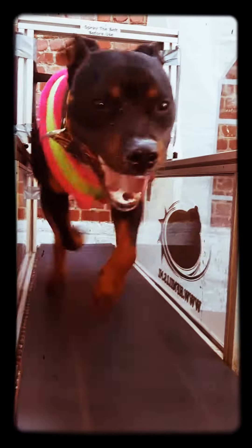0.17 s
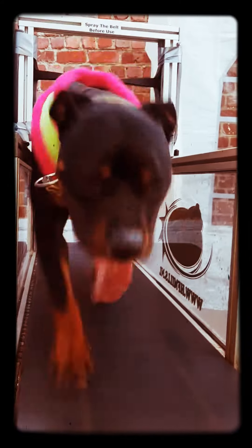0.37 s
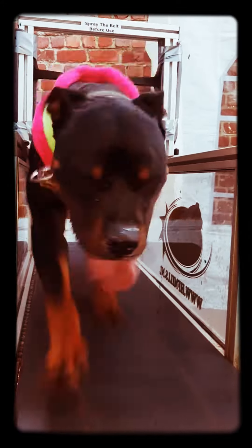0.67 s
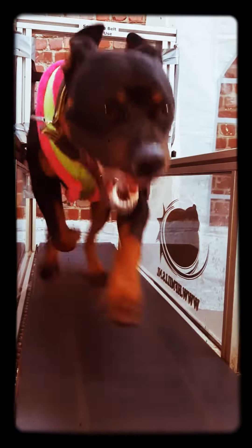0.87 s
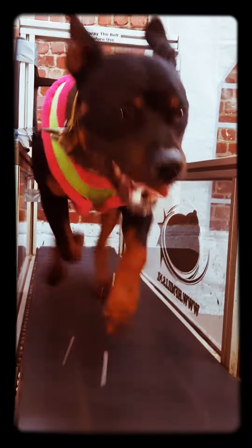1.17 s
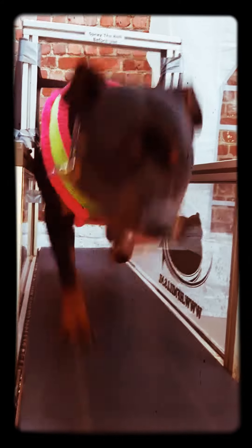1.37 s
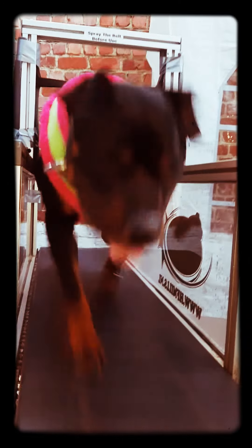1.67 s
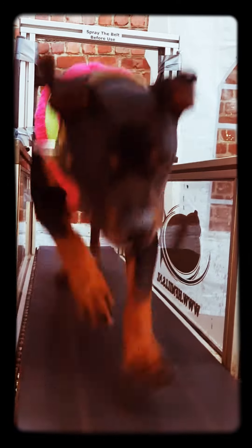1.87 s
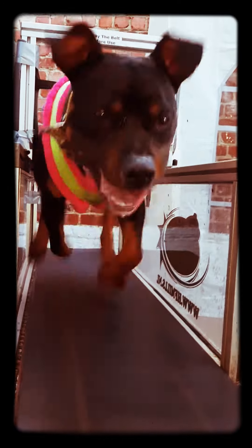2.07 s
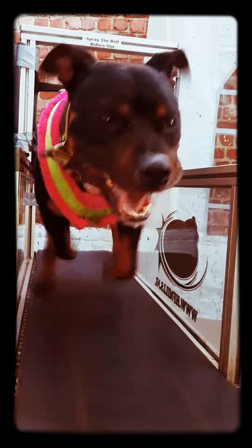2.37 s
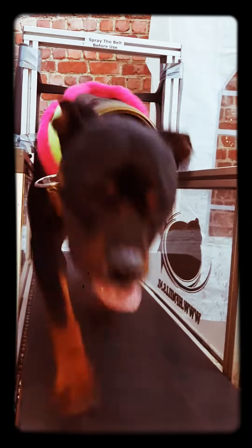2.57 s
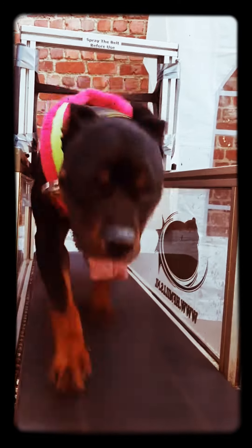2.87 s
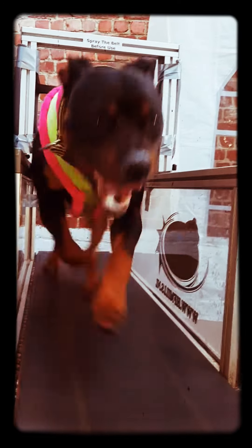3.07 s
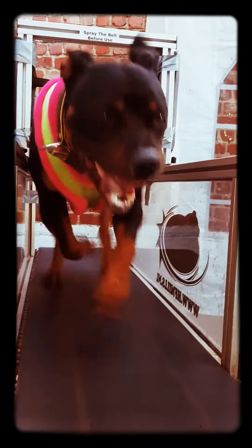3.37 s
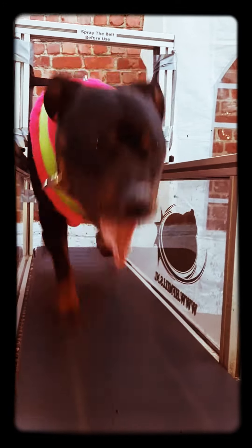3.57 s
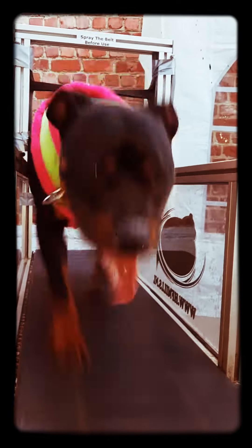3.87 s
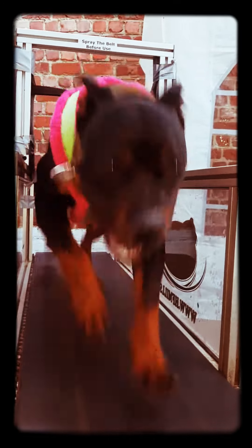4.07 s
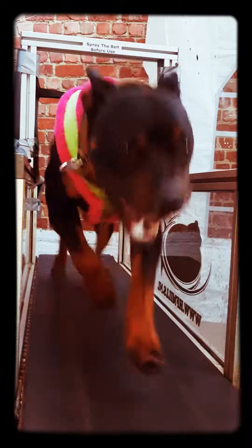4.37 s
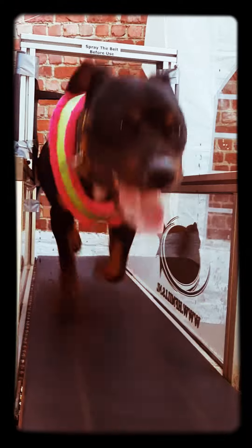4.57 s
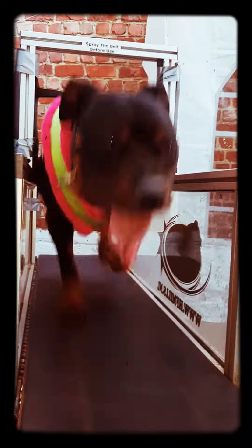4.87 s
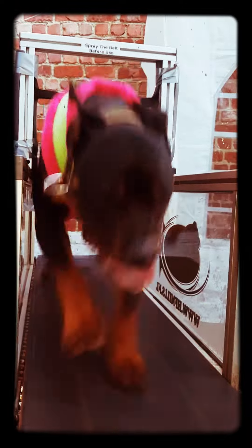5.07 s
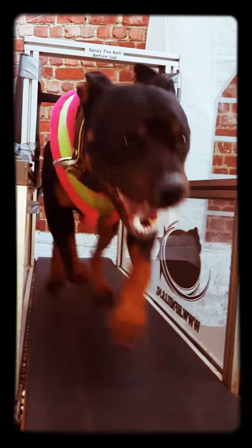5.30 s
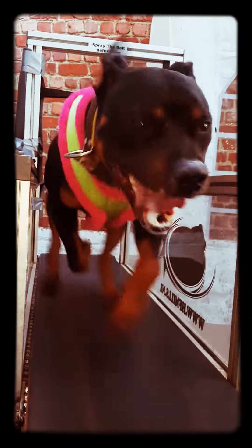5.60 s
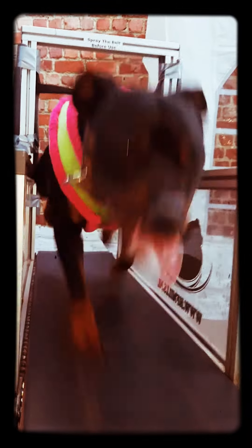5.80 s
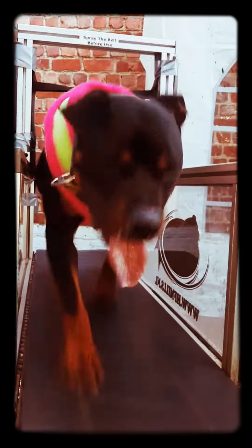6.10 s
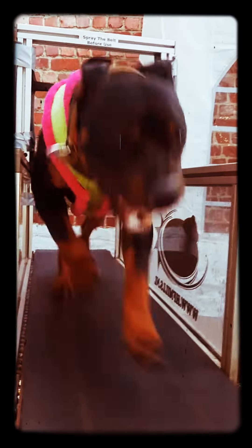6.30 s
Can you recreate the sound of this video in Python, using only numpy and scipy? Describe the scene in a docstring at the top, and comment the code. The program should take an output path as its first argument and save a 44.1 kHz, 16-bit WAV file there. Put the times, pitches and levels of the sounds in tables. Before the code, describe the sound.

Close stereo sound of a heavy dog galloping on an unpowered slat treadmill in a brick room. About three times a second a soft hind thud leads into two louder forepaw thuds with hard, bright claw and slat clacks. Under them the belt rumbles, clatters and hisses without pause, swelling with each stride, while slats tick rapidly and bearings whine faintly. Short echo.

```python
"""A brick room, two close microphones facing a dog that gallops on an unpowered slat treadmill.
At about three strides a second, padded thuds ring the deck; claws and slats clack in short bright clicks.
Streams of tiny knocks make the rollers' rumble, clatter and hiss, which swell under each stride; the bearings
whine in two narrow bands. Between the clacks the slats tick over the end wheel. The walls add a short echo."""
import sys
import numpy as np
from scipy import signal
from scipy.fft import rfft, irfft
from scipy.io import wavfile
from scipy.ndimage import uniform_filter1d

SR = 44100
rng = np.random.default_rng(int(sys.argv[2]) if len(sys.argv) > 2 else 0)


def log_audio(samples):
    """Write samples as a 16-bit WAV file to the path given in sys.argv[1]."""
    # one column per channel
    frames = np.atleast_2d(samples).T
    # limit to full scale, then quantise
    limited = np.clip(frames, -1, 1)
    pcm = np.round(limited * 32767).astype(np.int16)
    wavfile.write(sys.argv[1], SR, pcm)


N = 284004
TIME = np.arange(N) / SR

# one gallop stride a row: (hind paws land [s], first forepaw [s], second forepaw [s],
# hind weight [dB], first forepaw weight [dB], second forepaw weight [dB])
STRIDES = [(-0.115, 0.014, 0.078, 4.5, 1, 0.5), (0.255, 0.33, 0.409, 1, 0, 0),
           (0.549, 0.657, 0.738, -1, 0.5, -1), (0.877, 0.996, 1.063, -0.5, 0.5, -2),
           (1.2, 1.296, 1.37, 0, -0.5, 2), (1.494, 1.619, 1.688, 0, -0.5, 2.5),
           (1.818, 1.924, 1.99, 0, 2.5, 0), (2.137, 2.256, 2.309, 2, 1, 1.5),
           (2.43, 2.531, 2.61, -1, 2.5, 3.5), (2.73, 2.857, 2.922, 1.5, 1, 1.5),
           (3.058, 3.192, 3.256, 2.5, -2, -1), (3.382, 3.5, 3.57, -0.5, -0.5, -1),
           (3.684, 3.814, 3.882, -5.5, 1.5, -1.5), (4.028, 4.119, 4.2, 0, 0.5, -3),
           (4.34, 4.445, 4.524, -1.5, -4.5, -2), (4.675, 4.781, 4.846, -2.5, -2.5, -4),
           (5.01, 5.099, 5.17, -2, -6, -3.5), (5.305, 5.417, 5.48, -2, -1.5, -1),
           (5.615, 5.73, 5.8, 0.5, -2.5, -0.5), (5.934, 6.071, 6.131, 1, -0.5, 0.5),
           (6.258, 6.38, 6.451, 0.5, -1, -15)]
# claws and slats striking hard: (time [s], relative level [dB], brightness tilt [dB])
HARD_STRIKES = [(0.0096, 4.5, -2.5), (0.0212, 0.5, -1.0), (0.068, 3, 6), (0.0764, 1, 0), (0.0875, 1, 3),
                (0.0991, -3, 0.0), (0.1638, -4.5, -2), (0.255, -2, -8), (0.2672, -1.5, -12.0),
                (0.3245, -6, 0), (0.3336, 7, -3.5), (0.3444, -4, -8), (0.4015, -0.5, 1), (0.4096, -3, -7.0),
                (0.4642, -9, -9), (0.4767, -5.5, -6), (0.656, -7, -12), (0.6621, 7.0, -0.5),
                (0.674, 0, -4.0), (0.7277, -1, 1), (0.7524, -2, 2), (0.8065, -1, -1.0), (1.0032, -3, -12),
                (1.0583, 0.5, -9), (1.07, -3.3, -7.0), (1.0831, -9, -3.0), (1.1363, -9.5, -1),
                (1.1614, -6, 8), (1.1741, -8, 0), (1.293, -6, -6.0), (1.3042, 1, 4), (1.3161, -9, -8),
                (1.366, 4, -6), (1.3798, -8, -7.0), (1.3918, 1.5, 3), (1.4687, -2.0, 5), (1.61, -3, 8),
                (1.6194, 4.5, -6), (1.645, -6, -9), (1.6841, 7.5, -1.5), (1.6953, 2, 3), (1.708, -7, -4),
                (1.7191, -5.6, 3.0), (1.757, -6.9, 4), (1.7936, -5, -5), (1.8822, -6, -5), (1.9144, -2, 10),
                (1.9208, 0, -4.0), (1.9312, 7, -5), (1.9415, 4, -9), (1.993, 6, -4), (2.1924, 3, -3.0),
                (2.2461, -6, -5), (2.2536, 7.5, -1), (2.2654, -3, -4.0), (2.3033, 4.0, -7), (2.3135, 6, 1),
                (2.3246, 6, 1.0), (2.3374, -9, -3.0), (2.3975, -7.5, 6), (2.4083, -6, 1), (2.503, 0, -7),
                (2.5153, -6, -4), (2.526, 8, -1), (2.537, 4, -6), (2.5608, -5, -8), (2.5724, -5, -6),
                (2.6125, 6.5, -5), (2.6198, 5, 3.0), (2.63, 0.5, -4.0), (2.737, 1, -11), (2.7839, -1, 10),
                (2.7948, -7, -1), (2.8187, 1.4, 0), (2.8304, -2, 1), (2.855, 4, -3), (2.8646, 6, 3),
                (2.8768, 3, 0.0), (2.9, -2, -7), (2.9092, -1, -6), (2.914, 2, -2.0), (2.9249, -1, -3.0),
                (2.9354, 2.5, -1), (2.9466, -0.3, -3.0), (3.0398, -4.5, -3.0), (3.0645, -3.5, -12),
                (3.075, 0.5, -4.0), (3.168, -5, 2.0), (3.1907, -1.9, -2), (3.2417, -2, 0.0),
                (3.2731, 3.5, -2), (3.3097, -4.5, -4.0), (3.3567, -9, -8.0), (3.3681, -5, -12),
                (3.4043, -5, 4), (3.4393, -3, -3.0), (3.4519, -12, -2), (3.4849, -6.5, 2.0),
                (3.499, -0.5, -12.0), (3.5105, -10, -10.0), (3.5628, 1, -13), (3.571, 1, 7),
                (3.5805, 1.5, -7), (3.6529, -6.7, -2), (3.6655, -8, 1), (3.6767, -5.5, 4),
                (3.8073, 7.5, -0.0), (3.8184, 1, -9.0), (3.8728, 1, -3), (3.88, 7.5, -2.0),
                (3.8928, -2, -7.0), (3.9037, 1.5, -3), (3.9154, -2, 0), (3.9522, -5, -1),
                (3.9649, -5.0, -1), (3.9882, -7, -6), (4.0738, -3.5, -7), (4.1131, -1, 1),
                (4.1227, 8.5, -6), (4.1325, 5.5, -8), (4.189, 0, -7.0), (4.1956, 9.0, -9), (4.2069, 4, 0),
                (4.3807, 0.3, -8.5), (4.438, -1, -8), (4.445, -2, -4), (4.4552, -2.5, -11),
                (4.5185, 1, -3.0), (4.5294, 4.5, -3), (4.7059, -6, 2.0), (4.7732, -5.0, -1.0),
                (4.7797, 7, 1), (4.8353, 2, -7.0), (4.8445, -2, 0), (4.8554, 1, -15), (4.9573, -7, -9),
                (5.0223, -5.0, -12), (5.0861, -7.2, 0.0), (5.1103, 0, -14), (5.158, -2.5, -7),
                (5.1646, 2, -5), (5.177, -0.5, 0), (5.1865, -2.5, -6), (5.4201, 3.5, 3), (5.609, -1.0, -14),
                (5.7214, 7, -0.0), (5.7348, 11, -6), (5.7471, -4, -3), (5.799, 0.5, 3.0), (5.8097, -3, -10),
                (5.8232, -3.9, -16), (5.873, -4.5, 6), (5.899, -6.5, -6), (6.0612, -4, -5), (6.1283, -3, 4),
                (6.137, -2, -2.0), (6.148, -2, -15), (6.2112, -6, -14), (6.2229, -2.7, 0), (6.3739, -9, 2),
                (6.3835, 4.1, 9), (6.395, 1.5, -14)]
# the coasting belt as the dog speeds up and eases off: (time [s], relative level [dB])
COAST = [(0.0, 4.5), (1.0, 0), (2.2, 5), (3.0, 4), (3.9, 3), (4.6, -1), (5.25, -0.5), (5.8, 2.5),
         (6.44, 3.5)]
# how the belt's hiss answers a footfall: (coasting [dB], first hind paw [dB], second hind paw [dB],
# forepaw [dB], rise [s], hold [s], fall [s], dip in flight [dB])
HISS_LOAD = (-38, -39.5, -35.5, -31, 0.0067, 0.0283, 0.0129, 2)

RING_HZ, RING_OCTAVES = 2940, 0.23  # usual note of a struck slat and its spread


def paws():
    """Padded blows set the deck ringing: the hind pair lands far back as one thud, the forepaws close by."""
    # push of a padded paw: (frequency [Hz], level [dB per Hz])
    thud_spectrum = [(25, -61), (70, -27), (150, -3), (260, -6), (450, 7.5), (900, -0.5), (2000, -23),
                     (5000, -43), (16000, -51)]
    fore_db, hind_db = -13.2, -21.5  # relative levels of a forepaw and the hind pair at usual weight
    apart = 0.39  # share of a thud that reaches each microphone by its own path
    out = np.zeros((2, N))
    push = np.pad(colour(thud_spectrum), (0, SR // 12))
    for hind, first, second, hind_weight, first_weight, second_weight in STRIDES:
        landings = [(hind, hind_db + hind_weight),
                    (first, fore_db + first_weight),
                    (second, fore_db + second_weight)]
        for s, db in landings:
            add(out, s, amp(db) * blow(push, t60=0.049, scatter_db=7.0))
    shared = out.sum(0) / np.sqrt(2)
    return deck(apart * out + (1 - apart) * shared, ring_db=-0.5)


def clacks():
    """Hard strikes: a compact click with a few cycles of the slat's ring, then a small bounce as it settles."""
    strike_db, chatter_db = 0.53, -6  # first contact and bounce, against the table's level
    chatter_s = 0.0018  # usual delay of the bounce, up to an octave shorter or longer
    out = np.zeros((2, N))
    chances = rng.uniform(-1, 1, (len(HARD_STRIKES), 2))
    for (s, db, bright_db), (late, note) in zip(HARD_STRIKES, chances):
        strike = slat(bright_db, RING_HZ * 2 ** (RING_OCTAVES * note))
        strike = np.pad(strike, (0, SR // 40))
        contact = blow(strike, t60=0.005, scatter_db=-0.5)
        add(out, s, amp(db + strike_db) * contact)
        bounce = blow(strike, t60=0.014, scatter_db=5)
        add(out, s + chatter_s * 2 ** late, amp(db + chatter_db) * bounce)
    return out


def claws():
    """On the hardest landings a claw tip snaps against the belt in a very short contact."""
    # spectrum of the snap: (frequency [Hz], level [dB per Hz])
    snap_spectrum = [(3000, -37), (7000, -9), (9300, 1.5), (12000, 7), (16000, -17)]
    # claw tips catching the belt: (time [s], relative level [dB])
    catches = [(1.6844, -11), (1.9311, -4), (1.9415, -4), (1.993, -7.7), (2.3246, -7), (2.526, -3),
               (2.8646, -9), (3.2731, -11), (3.8073, -12), (3.8801, -0.5), (4.1227, -2), (4.1955, -7.3),
               (4.7804, -12), (5.7216, -4.2), (5.7345, -1.5)]
    out = np.zeros((2, N))
    snap = np.pad(colour(snap_spectrum), (0, SR // 50))
    for s, db in catches:
        add(out, s, amp(db) * blow(snap, t60=0.006, scatter_db=2))
    return out


def slats():
    """Between the hard clacks every slat ticks in turn over the end wheel, some much harder than others."""
    slats_per_s = 82
    tick_db, per_load, spread_db = -19, 0.26, 4  # relative tick level, its gain under load, its unevenness
    marks = np.sort([0, *np.array(HARD_STRIKES)[:, 0], N / SR])
    times = []
    for start, end in zip(marks, marks[1:]):
        steps = round((end - start) * slats_per_s)
        times.append(np.linspace(start, end, steps + 1)[1:-1])  # the clacks take the end points
    times = np.concatenate(times)

    force, bright, wobble, note = rng.standard_normal((len(times), 4)).T
    load_db = np.interp(times, TIME, loaded(*HISS_LOAD)) - HISS_LOAD[0]
    level_db = tick_db + per_load * load_db + spread_db * np.minimum(force, 1.4)
    times = times + 0.00043 * wobble
    notes_hz = RING_HZ * 2 ** (RING_OCTAVES * note)
    out = np.zeros((2, N))
    for s, db, tilt_db, hz in zip(times, level_db, 9.5 * bright, notes_hz):
        add(out, s, amp(db) * blow(slat(tilt_db, hz), t60=0.01, scatter_db=-3))
    return out


def knocks():
    """Heavy landings make one part of the frame ring: single short modes, the higher ones dying sooner."""
    # the ringing landings: (time [s], relative level [dB], pitch [Hz])
    landings = [(0.393, -21, 920), (1.311, -32, 378), (1.63, -27, 380), (1.921, -24, 394),
                (1.935, -26, 506), (2.535, -22.5, 917), (2.808, -31, 385), (3.568, -27, 917),
                (4.143, -27, 500)]
    t = np.arange(SR // 6) / SR
    out = np.zeros((2, N))
    for s, db, hz in landings:
        t60 = 0.11 * np.sqrt(400 / hz)  # 0.11 s at 400 Hz
        envelope = (1 - np.exp(-t / 0.0023)) * np.exp(-np.log(1000) * t / t60)
        knock = amp(db + 4.5) * envelope * np.sin(2 * np.pi * hz * t)
        add(out, s, np.tile(knock, (2, 1)))
    return out


def scuffs():
    """Paws scuff the slats as they push off: rough swishes of pads that grip and slip."""
    # the push-offs: (time [s], relative level [dB], pitch [Hz])
    push_offs = [(.1, -32, 2340), (.42, -36, 2500), (.745, -33.5, 2310), (1.03, -34, 2320),
                 (1.32, -36, 1901), (1.99, -32, 2326), (5.49, -38, 2340), (5.77, -31, 1390),
                 (6.138, -35.5, 2804)]
    grip = unit(amp(3.9 * drift(per_s=230)))
    swishes = sum(amp(db) * swell(s, length=0.042) * whistle(hz, width_hz=500) for s, db, hz in push_offs)
    return grip * swishes


def rollers():
    """Slats roll over the wheels in countless small knocks, louder under the dog's weight."""
    # spectra of the three layers: (frequency [Hz], level [dB per Hz])
    rumble_spectrum = [(25, -59), (60, -27), (110, -18.5), (190, -13), (225, -3), (380, -1), (560, -5.5),
                       (750, -7), (1400, -24.5), (4000, -85)]
    clatter_spectrum = [(300, -34), (560, -0.5), (720, -5), (950, 0), (1200, 0.6), (1600, 1), (2100, -5),
                        (3000, -3.5), (4500, -22), (7000, -23), (9000, -38), (16000, -43)]
    hiss_spectrum = [(800, -23.5), (2000, -6.5), (2600, -1.5), (3000, 2), (3900, 1), (5500, -3), (7000, -4),
                     (8000, -10.5), (9300, -13.5), (12000, -17.5), (16000, -27)]
    # answer to a footfall: (coasting [dB], first hind paw [dB], second hind paw [dB], forepaw [dB],
    # rise [s], hold [s], fall [s], dip in flight [dB])
    rumble_load = (-47.5, -38.5, -38, -35.5, 0.0471, 0.07, 0.0538, 4.5)
    clatter_load = (-40, -37.5, -35.5, -30, 0.0184, -0.0054, 0.048, 6)

    shake = drift(per_s=75)
    rumble = deck(convolve(impacts(per_s=800, range_db=2.0), colour(rumble_spectrum)), ring_db=-7.5)
    clatter = deck(convolve(impacts(per_s=2000, range_db=2.5), colour(clatter_spectrum)), ring_db=-6.0)
    hiss = convolve(impacts(per_s=7000, range_db=1.5), colour(hiss_spectrum))
    rumble = unit(rumble) * amp(loaded(*rumble_load) + 0.3 * shake)
    clatter = patchy(clatter, patchy_db=2.5) * amp(loaded(*clatter_load) + 0.97 * shake)
    hiss = patchy(hiss, patchy_db=2.5) * amp(loaded(*HISS_LOAD) + 0.3 * shake)
    return rumble + clatter + hiss


def fizz():
    """Fine sizzle of the spinning wheels: it follows the belt's speed more than the load."""
    # spectrum of the sizzle: (frequency [Hz], level [dB per Hz])
    fizz_spectrum = [(2500, -18), (6500, 1), (8200, -3), (9300, -4.5), (11000, 3), (13000, 3.5),
                     (16000, -5.5)]
    sizzle = convolve(impacts(per_s=12000, range_db=3.5), colour(fizz_spectrum))
    load_db = 0.25 * loaded(*HISS_LOAD)
    speed_db = 0.47 * curve(COAST, axis=1)
    level_db = -32.0 + load_db + speed_db + 0.74 * drift(per_s=38)
    return patchy(sizzle, patchy_db=3.0) * amp(level_db)


def bearings():
    """A thin, fuzzy whine on two close notes follows the load on the wheels and flares into short squeals."""
    # the two notes: (frequency [Hz], relative level [dB])
    whine_notes = [(10425, 0), (10590, -2.5)]
    # squeals as the wheels take load: (time [s], level [dB], length [s])
    squeals = [(.11, -45, 0.048), (0.316, -35, 0.04), (0.668, -46, .06), (0.957, -45, .07),
               (1.08, -47, 0.063), (1.27, -44, .06), (1.89, -40, .07), (2.227, -36, 0.026),
               (2.535, -38, 0.031), (3.138, -43, 0.046), (3.47, -44, .045), (3.634, -54, .05),
               (3.771, -43, .06), (4.09, -47, .06), (5.1, -54, .046), (5.397, -44, 0.088), (6.09, -53, .12)]
    whine_db, follows = -57, 0.45  # whine at the coasting reference, and its gain under load
    notes = unit(sum(amp(db) * whistle(hz, width_hz=52) for hz, db in whine_notes))
    level = amp(whine_db + follows * (loaded(*HISS_LOAD) - HISS_LOAD[0]))
    flares = sum(amp(db) * swell(s, length) for s, db, length in squeals)
    return notes * (level + flares)


def room(x):
    """Diffuse reflections from the walls: decaying noise, each band with its own decay time."""
    # the room's decay: (frequency [Hz], t60 [s])
    decay = [(200, 0.1), (1000, 0.36), (4000, 0.097), (14000, 0.05)]
    noise = rng.standard_normal((2, SR // 2))
    hz, t, z = signal.stft(noise, SR, nperseg=256)
    fade = np.exp(-np.log(1000) * t / read(decay, hz)[:, None])
    tail = signal.istft(z * fade, SR, nperseg=256)[1]
    tail *= np.clip(np.arange(tail.shape[1]) / SR / 0.0042, 0, 1)  # builds up over 4.2 ms
    return convolve(x, tail / np.linalg.norm(tail[0]))


def loaded(coast_db, hind_db, other_hind_db, fore_db, rise_s, hold_s, fall_s, flight_db):
    """Level in dB of a belt layer: it swells under each of the four paws and dips while the dog is in the air."""
    hind_gap_s = 0.044  # from one hind paw to the other
    flight_lead_s, flight_s = 0.044, 0.11  # all paws are off the belt just before the hind pair lands
    t = TIME[::64]
    power = amp(coast_db + curve(COAST, axis=1)[::64]) ** 2
    airborne = 0
    for hind, first, second, hind_weight, first_weight, second_weight in STRIDES:
        airborne = airborne + np.exp(-((t - hind + flight_lead_s) / (flight_s / 2)) ** 2)
        landings = [(hind, hind_db + hind_weight),
                    (hind + hind_gap_s, other_hind_db + hind_weight),
                    (first, fore_db + first_weight),
                    (second, fore_db + second_weight)]
        for s, db in landings:
            before, after = (s - t) / rise_s, (t - s - hold_s) / fall_s
            away = np.maximum(np.maximum(before, after), 0)
            power = power + (amp(db) * np.exp(-away)) ** 2
    return np.interp(TIME, t, 10 * np.log10(power) - flight_db * airborne)


def deck(x, ring_db):
    """A force heard directly and through the decaying modes of the deck and frame."""
    # what they ring with: (frequency [Hz], relative level [dB], t60 [s])
    modes = [(259, -6.5, 0.12), (311, 10, 0.095), (379, 11, 0.12), (434.6, 4, 0.066), (497.6, 10.5, 0.087),
             (583, 4, 0.19), (714, 8, 0.059), (805, 5, 0.021), (906, 8.5, 0.091), (1100, 1, 0.11)]
    t = np.arange(SR // 5) / SR
    ring = sum(amp(db - 60 * t / t60) * np.cos(2 * np.pi * hz * t) / t60 for hz, db, t60 in modes)
    return x + amp(ring_db) * convolve(x, ring * 2 * np.log(1000) / SR)


def slat(bright_db, hz):
    """One struck slat: a click and a note that dies within a few milliseconds."""
    # spectrum of the click: (frequency [Hz], level [dB per Hz])
    click_spectrum = [(100, -59), (400, -16.5), (1000, -10.5), (2200, -15), (2800, -2), (3600, 4.5),
                      (5000, 0.8), (7100, 1.5), (7900, -11), (9500, -14.5), (12000, -15.5), (16000, -28)]
    ring_db, ring_t60_s = -8.5, 0.006  # the slat's own note, against its click
    click = colour(click_spectrum, bright_db)
    t = np.arange(len(click)) / SR
    envelope = np.exp(-np.log(1000) * t / ring_t60_s) * (1 - np.exp(-t * hz))
    ring = np.cos(2 * np.pi * hz * t) * envelope
    both = click + amp(ring_db) * ring / np.linalg.norm(ring)
    return both / np.linalg.norm(both)


def blow(x, t60, scatter_db):
    """A sharp contact, then a short scatter through the slats that differs at each microphone."""
    t = np.arange(SR // 12) / SR
    response = rng.standard_normal((2, len(t))) * np.exp(-np.log(1000) * t / t60)
    response *= amp(scatter_db) / np.linalg.norm(response[0])
    response[:, 0] += 1  # the contact itself
    return convolve(x, response / np.linalg.norm(response[0]))


def impacts(per_s, range_db):
    """A stereo stream of tiny random knocks of uneven size."""
    shape = (3, N)
    size = amp(range_db * np.minimum(rng.exponential(1, shape), 4))
    sign = rng.choice([-1, 1], shape)
    strikes = rng.random(shape) < per_s / SR
    return unit(spread(size * sign * strikes))


def spread(three):
    """One shared and two separate signals become a pair partly alike at the two microphones."""
    # likeness of the belt's sound at the microphones: (frequency [Hz], likeness [0-1])
    likeness = [(40, 0), (130, 1), (300, 0.94), (650, 0.92), (1400, 0.5), (2300, 0), (3000, 0.47),
                (4500, 0.01), (7000, 0.1), (14000, 0)]
    z = rfft(three)
    same = np.clip(read(likeness, np.fft.rfftfreq(N, 1 / SR)), 0, 1)
    return irfft(np.sqrt(same) * z[0] + np.sqrt(1 - same) * z[1:], N)


def patchy(x, patchy_db):
    """Random, smoothed level changes over time and frequency make the noise's colour uneven."""
    z = signal.stft(x, SR, nperseg=512)[2]
    field = rng.standard_normal(z.shape[1:])
    field = uniform_filter1d(field, size=4, axis=0)  # smooth over frequency
    field = uniform_filter1d(field, size=5, axis=1)  # smooth over time
    return unit(signal.istft(z * amp(patchy_db * unit(field)), SR, nperseg=512)[1][:, :N])


def whistle(centre_hz, width_hz):
    """Stereo noise in one resonance, down to half amplitude width_hz either side."""
    band = 1 / (1 + ((np.fft.rfftfreq(N, 1 / SR) - centre_hz) / width_hz) ** 4)
    return unit(irfft(rfft(rng.standard_normal((2, N))) * band, N))


def swell(s, length):
    """A bell in time, with the given length at half power."""
    return np.exp(-2 * np.log(2) * ((TIME - s) / length) ** 2)


def drift(per_s):
    """Smooth random wander of rms 1, slower than per_s cycles a second."""
    slow = np.fft.rfftfreq(N, 1 / SR) < per_s
    return unit(irfft(rfft(rng.standard_normal(N)) * slow, N))


def colour(points, tilt_db=0):
    """Causal (minimum-phase) response of unit energy with the given spectrum, tilted around 4.5 kHz."""
    hz = abs(np.fft.fftfreq(2048, 1 / SR))
    tilt = tilt_db * np.tanh((hz - 4500) / 1200) / 2
    log_gain = np.log(amp(read(points, hz) + tilt))
    response = np.fft.ifft(np.exp(signal.hilbert(log_gain).conj())).real[:len(hz) // 2]
    return response / np.linalg.norm(response)


def convolve(x, response):
    """Convolution along time, cut to the input's length."""
    return signal.fftconvolve(np.atleast_2d(x), np.atleast_2d(response), axes=1)[:, :x.shape[-1]]


def add(mix, s, sound):
    """Mixes a stereo sound in at s seconds."""
    part = mix[:, max(round(s * SR), 0):][:, :sound.shape[1]]
    part += sound[:, :part.shape[1]]


def read(points, hz):
    """Reads a frequency table on a log-frequency axis."""
    f, value = np.transpose(points)
    return np.interp(np.log(hz + 1), np.log(f + 1), value)


def curve(rows, axis):
    """One column of a control table at every sample."""
    rows = np.asarray(rows)
    return np.interp(TIME, rows[:, 0], rows[:, axis])


def amp(db):
    """Decibels to gain."""
    return 10 ** (np.asarray(db) / 20)


def unit(x):
    """Scales to rms 1."""
    return x / np.sqrt(np.mean(x ** 2) + 1e-20)


def lag_left(pair):
    """Sound reaches the right microphone first, the left one 7.5 samples later."""
    left_lag_s = 7.5 / SR
    late = np.exp(-2j * np.pi * np.fft.rfftfreq(N, 1 / SR) * left_lag_s)
    return np.array([irfft(rfft(pair[0]) * late, N), pair[1]])


def scene():
    """The footfalls with their echo, over the running treadmill."""
    hits = paws() + clacks() + claws() + slats() + knocks() + scuffs()
    belt = rollers() + fizz() + bearings()
    return lag_left(hits + belt + amp(-10.5) * room(hits))


def record(dry):
    """The left microphone is a little fuller in the bass; tall peaks are rounded off; then the band limit."""
    edge_hz = 15900
    bass = signal.lfilter(*signal.butter(1, 450, fs=SR), dry)
    heard = dry + np.array([[0.13], [-0.12]]) * bass
    heard = heard / (1 + heard ** 4) ** 0.25
    low_pass = signal.firwin(301, edge_hz, window=("kaiser", 9), fs=SR)
    return signal.oaconvolve(heard, low_pass[None], "same", axes=1)


dry = scene()
out = record(dry)
log_audio(out)
```